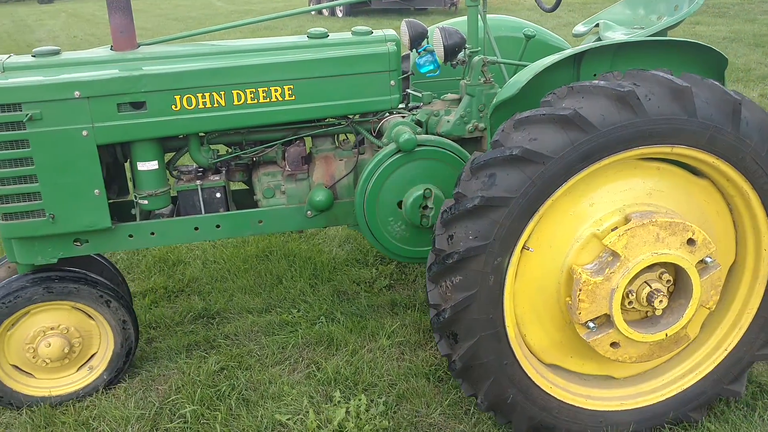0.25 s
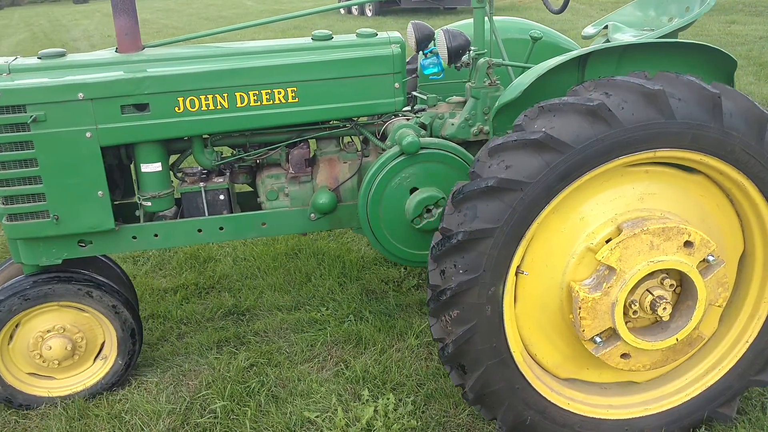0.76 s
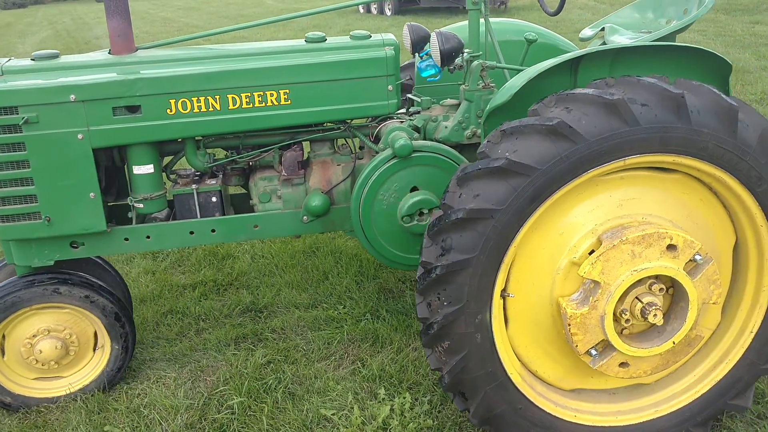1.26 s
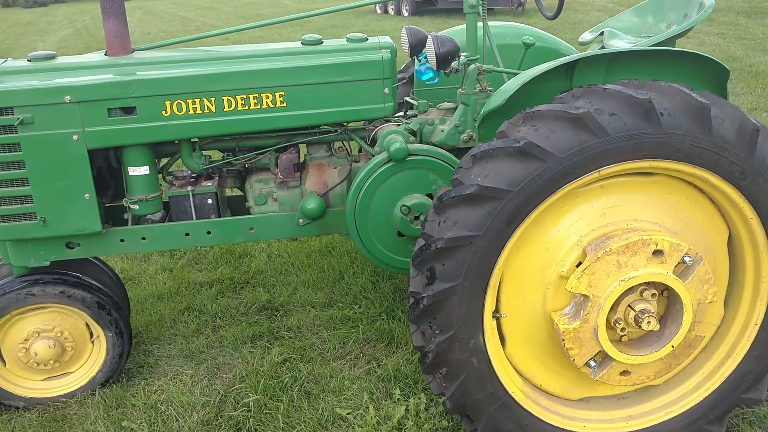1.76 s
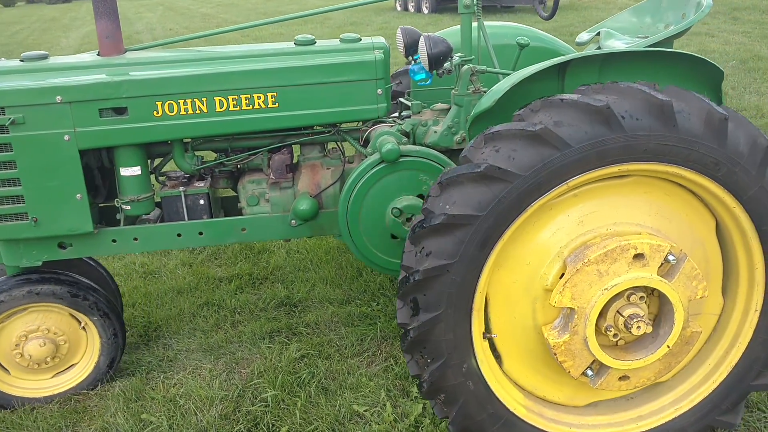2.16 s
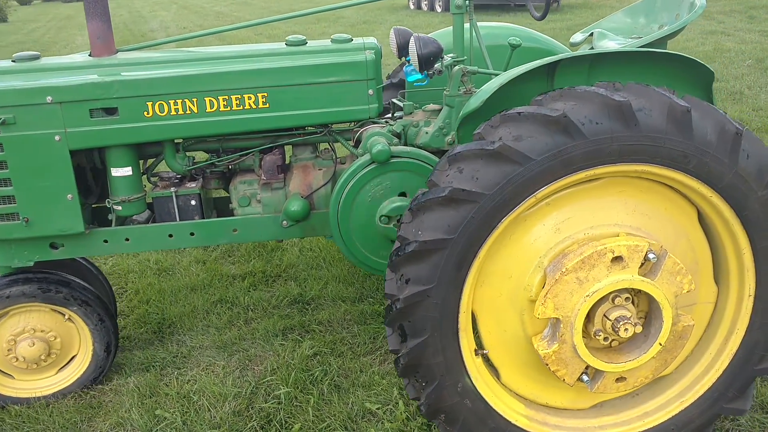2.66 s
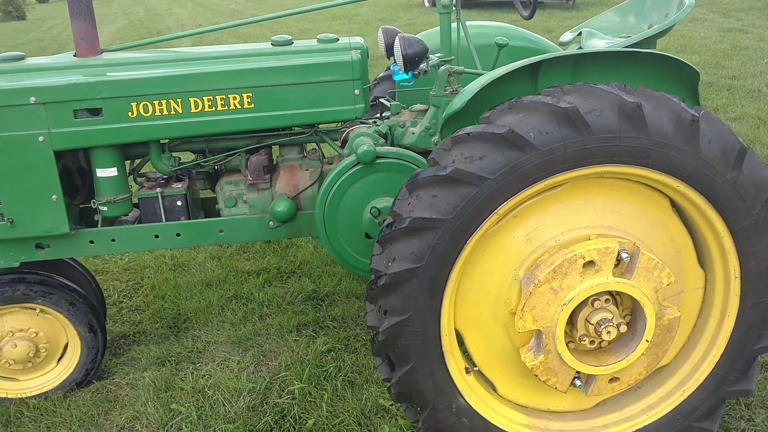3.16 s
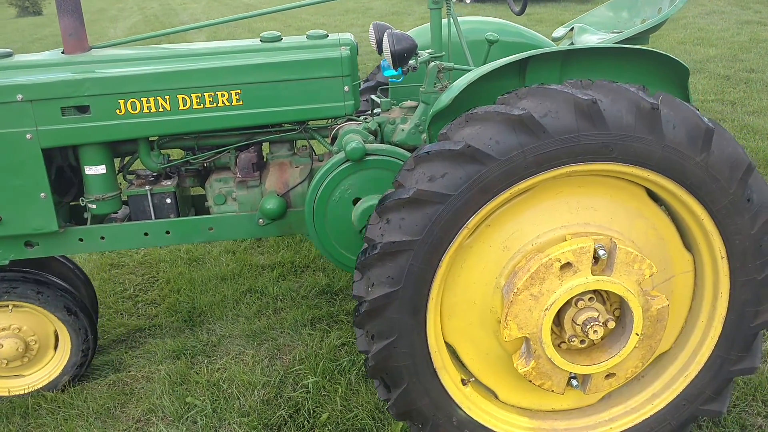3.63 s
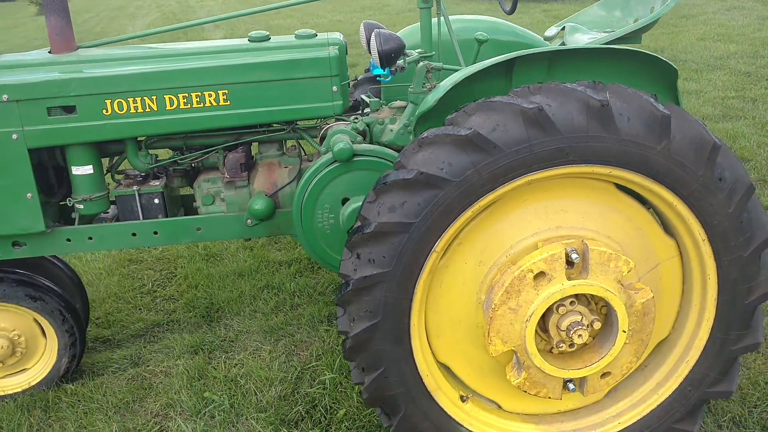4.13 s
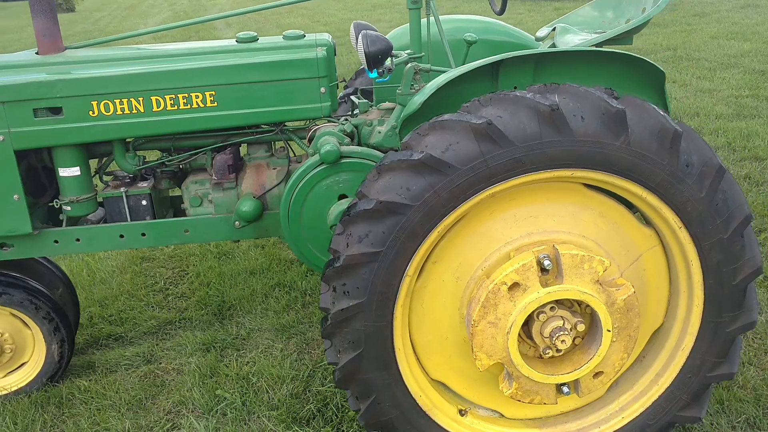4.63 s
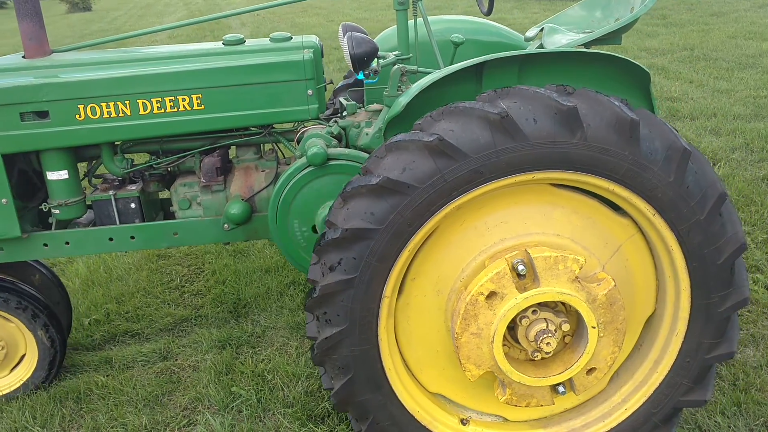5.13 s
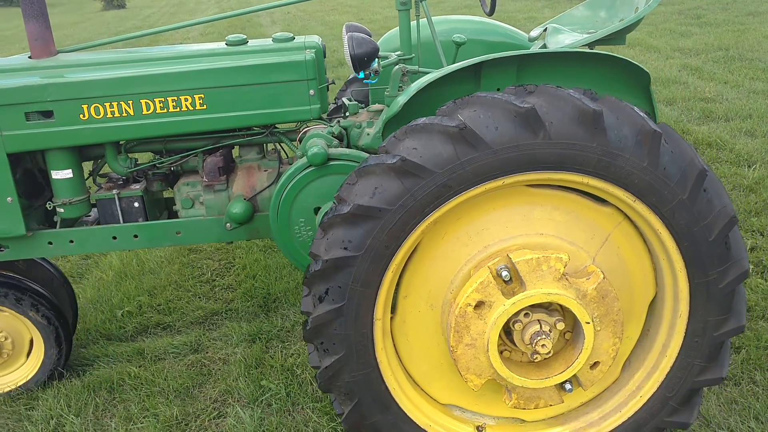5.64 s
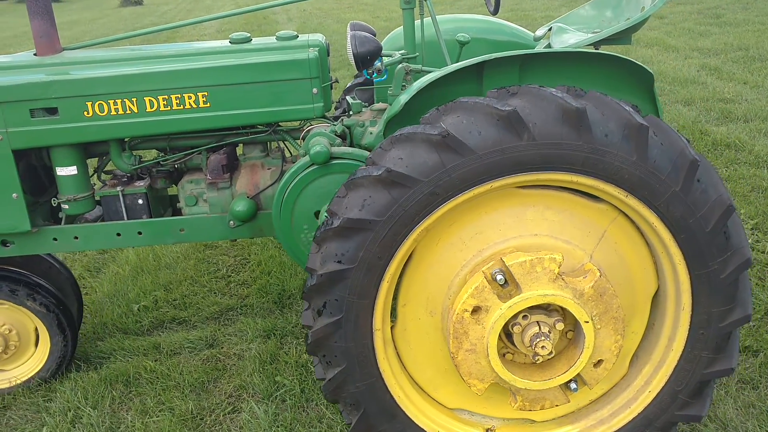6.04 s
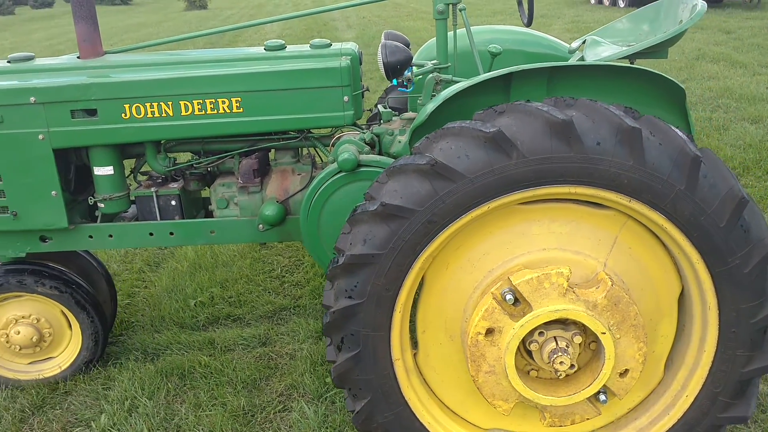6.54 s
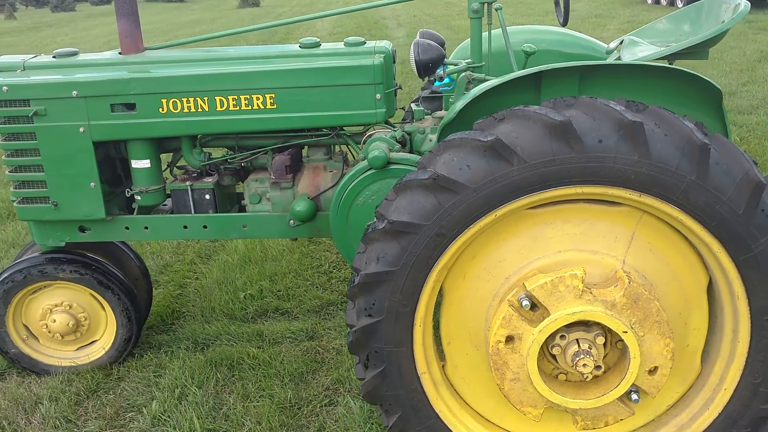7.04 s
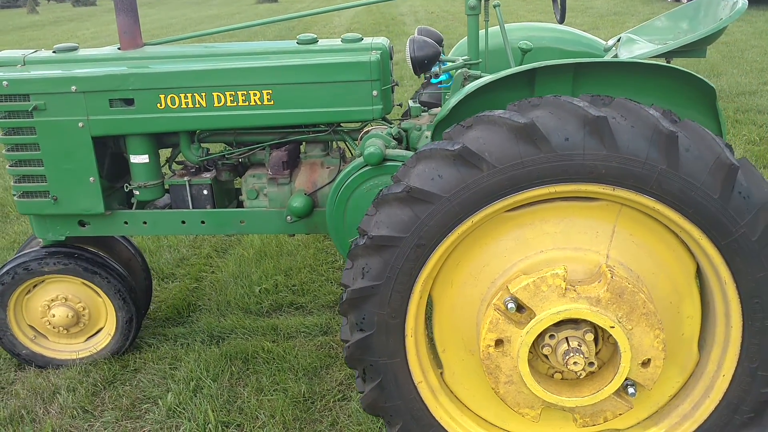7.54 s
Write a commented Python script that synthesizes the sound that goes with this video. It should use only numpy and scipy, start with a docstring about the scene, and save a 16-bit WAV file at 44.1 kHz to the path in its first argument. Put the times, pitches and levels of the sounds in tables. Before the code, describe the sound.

An old two-cylinder tractor idles very slowly outdoors, a sharp metallic clack then two hissing exhaust chuffs repeating over rumble, clatter and insects.

```python
"""Over a rumbling pipe, clattering gears and insects comes a sharp clack, then two hissing chuffs, again and again.
It is an old two-cylinder tractor idling very slowly on a lawn, and getting slower.
Chuffs, rumble, clatter and the insect choirs are noise shaped by resonances; the valve gear clacks in short
rattling bursts; hum, tinks, struck steel and one insect are wavering sine tones; pops are single pressure waves.
Two microphone ports hear it all, differing in colour and phase."""
import sys
import numpy as np
from scipy import signal
from scipy.fft import rfft, irfft, next_fast_len
from scipy.io import wavfile
from scipy.ndimage import uniform_filter1d, map_coordinates

SR = 44100
rng = np.random.default_rng(int(sys.argv[2]) if len(sys.argv) > 2 else 0)


def wav_record(signal):
    """Record a signal, one row per channel, as 16-bit PCM in the file named by sys.argv[1]."""
    frames = np.transpose(np.atleast_2d(signal))
    bounded = np.clip(frames, -1, 1)
    # unit amplitude maps onto the largest positive 16-bit level
    quanta = np.round(bounded * 32767).astype(np.int16)
    wavfile.write(sys.argv[1], SR, quanta)


N = 343539


def amp(db):
    """Turn decibels into a gain."""
    return 10 ** (np.asarray(db) / 20)


def unit(x):
    """Scale a signal to rms 1."""
    return x / np.sqrt(np.mean(x ** 2) + 1e-20)


def along(points, hz):
    """Read a curve of (Hz, value) points, with frequency on a log axis."""
    point_hz, value = np.transpose(points)
    return np.interp(np.log(hz + 1), np.log(point_hz + 1), value)


def curves(rows):
    """Draw one curve over time for each column after the time column."""
    s, *columns = np.transpose(rows)
    return [np.interp(np.arange(N) / SR, s, column) for column in columns]


def wobble(rate):
    """Draw a smooth random curve with this many knots a second."""
    knots = rng.standard_normal(int(N * rate / SR) + 4)
    return map_coordinates(knots, [np.arange(N) * rate / SR])


def filtered(x, response):
    """Pass a signal through a complex response of frequency."""
    m = next_fast_len(N + SR // 2)
    spectrum = rfft(x, m) * response(np.fft.rfftfreq(m, 1 / SR))
    return irfft(spectrum, m)[..., :N]


def modes(table):
    """Response of several resonances, each given as (Hz, width in Hz, dB), with alternating sign."""
    def response(f):
        total = 0
        for k, (centre, width, db) in enumerate(table):
            damping = 1j * f * width
            total = total + (-1) ** k * amp(db) * damping / (centre * centre - f * f + damping)
        return total
    return response


# How much alike noise is at the two ports. Each row: frequency in Hz, likeness (1 is identical).
PORT_LIKENESS = [(60, .65), (250, .8), (500, .6), (750, .94), (1250, .99), (1650, .75), (2290, .97),
                 (2370, .998), (2720, .998), (2790, .94), (3200, .85), (15000, .85)]


def rush(response, level, patchy_db=0, most_alike=1):
    """Patchy noise, partly alike at both ports: it follows a changing level, then rings through a response."""
    z = signal.stft(rng.standard_normal((2, N + 512)), nperseg=512)[2]
    patches = uniform_filter1d(rng.standard_normal(z.shape[1:]), size=4, axis=0)
    patches = unit(uniform_filter1d(patches, size=5, axis=1))
    pair = unit(signal.istft(z * amp(patchy_db * patches), nperseg=512)[1][:, :N])

    def shape(hz):
        colour = response(hz)
        turn = np.arccos(np.minimum(along(PORT_LIKENESS, hz), most_alike)) / 2
        return colour / np.sqrt(np.mean(abs(colour) ** 2)) * np.array([np.cos(turn), np.sin(turn)])

    shared, opposite = filtered(level * pair, shape)
    return np.array([shared + opposite, shared - opposite])


def add(track, s, piece):
    """Mix a piece into a track at s seconds."""
    part = track[round(s * SR):][:len(piece)]
    part += piece[:len(part)]


def pulse(db, hz, half_s):
    """A short pressure wave whose trough comes 20 ms after its start."""
    late = np.arange(round(.04 * SR)) / SR - .02
    return -amp(db) * np.cos(2 * np.pi * hz * late) * np.exp(-(late / half_s) ** 2 / 2)


def rattle(per_s, spread_db):
    """Gain of rms 1 made of many tiny, uneven contacts, each fading with a 1 ms time constant."""
    hits = (rng.random(N) < per_s / SR) * amp(spread_db * rng.standard_normal(N))
    fade = np.exp(-np.arange(SR // 200) / SR / .001)
    return unit(.5 + signal.fftconvolve(hits, fade)[:N])


# Insects in the grass. Each row: time in seconds, base level of the high choir in dB, of the low choir in dB.
INSECT_LEVELS = [(0.0, -60.5, -68), (1.67, -61.5, -68.5), (1.84, -66, -72), (3.25, -61.5, -69),
                 (7.29, -63.5, -72.5), (7.79, -58.5, -65)]
CHIRP_HZ, CHIRP_DB, CHIRP_WAVER_HZ = 5230, -65, 50  # a single singer in the low choir


def insects():
    """Two choirs of banded noise: a high sizzle and a pulsing lower one with one thin singer."""
    def band(centre_hz, width_hz):
        return lambda hz: modes([(centre_hz, width_hz, 0)])(hz) ** 3

    high_db, low_db = curves(INSECT_LEVELS)
    high_db = high_db + 6.0 + 0.25 * wobble(230) + 1.5 * wobble(4.32)
    low_db = low_db + 5.5 + 1.0 * wobble(41)
    high = rush(band(8205, 1560), amp(high_db), patchy_db=0.0)
    low = rush(band(5040, 1630), amp(low_db), patchy_db=3.0)
    gate = np.clip(wobble(40) + wobble(3) - .6, 0, 1.5)  # the singer comes and goes
    chirp_turns = np.cumsum(CHIRP_HZ + CHIRP_WAVER_HZ * wobble(28)) / SR
    return high + low + amp(CHIRP_DB) * gate * np.sin(2 * np.pi * chirp_turns)


SURGE_S, EBB_S = 0.03, 0.045  # time the flow takes to step up; time constant of the ebb


def flow(early_share_db):
    """Gas flow in the pipe: starts at the opening clack, is full by the first chuff, ebbs after the second."""
    t, out = np.arange(N) / SR, np.zeros(N)
    times = [s for s, *_ in CHUFFS] + [N / SR]
    ramp = lambda s: np.clip((t - s) / SURGE_S, 0, 1)
    for (clack_s, *_, early_db, full_db), first_s, second_s in zip(ENGINE_CYCLES, times[::2], times[1::2]):
        early = amp(early_db + early_share_db)
        rise = early * ramp(clack_s) + (amp(full_db) - early) * ramp(first_s - SURGE_S)
        out += rise * np.exp(-np.clip(t - second_s, 0, None) / EBB_S)
    return out


# Engine sound between the swells. Each row: time in seconds, base level of the rumble in dB, of the clatter in dB.
RUNNING_LEVELS = [(0.0, -47, -53.5), (0.5, -45, -50.5), (1.25, -48.5, -53.5), (1.95, -52.5, -55),
                  (2.7, -51, -55.5), (3.4, -47.5, -53), (4.1, -49, -54.5), (4.85, -51, -54),
                  (5.6, -55, -58), (6.35, -55.5, -56.5), (7.25, -54.5, -55.5), (7.79, -60, -66)]
# Resonances of the exhaust pipe. Each row: frequency in Hz, width in Hz, level in dB.
PIPE_MODES = [(156.4, 119, -15.5), (202, 35, -8.5), (261.3, 24.5, -5.5), (300.4, 11.6, -3),
              (337.8, 12, -3.5), (365.6, 32.6, -5), (433, 79, -9)]
# Colour of the gear clatter. Each row: frequency in Hz, relative level in dB per Hz.
GEAR_COLOUR = [(450, -3), (560, -7), (740, 0), (900, -5), (1200, -8), (1400, -15), (2100, -13), (2600, -20),
               (3300, -19), (4000, -24), (6300, -29), (9500, -33), (12000, -41), (15500, -50)]
# Two pipe modes sing. Each row: time in seconds, base level of the lower in dB, of the upper in dB.
HUM_LEVELS = [(0.0, -60.5, -60), (0.41, -61.5, -46), (0.52, -48.5, -56), (0.82, -52, -50),
              (0.87, -67, -58.5), (1.63, -65, -48), (1.67, -62, -58), (1.71, -52, -39), (1.78, -63, -41),
              (1.82, -56, -66), (2.26, -67, -54), (2.32, -52, -57), (2.6, -65.5, -52), (2.73, -53, -50.5),
              (2.86, -68, -61), (2.97, -46.5, -41.5), (3.08, -56, -56), (3.14, -56.5, -38),
              (3.47, -63, -65.5), (3.66, -58, -42), (4.21, -62.5, -65), (4.49, -57, -41.5),
              (4.58, -64.5, -49.5), (5.21, -63.5, -62.5), (5.27, -52, -33), (5.36, -71, -54.5),
              (5.81, -66, -63), (5.9, -74, -52), (6.09, -55.5, -48), (6.16, -60, -51.5),
              (6.64, -71.5, -56.5), (6.81, -60, -41.5), (6.92, -49.5, -46), (7.14, -64, -55),
              (7.59, -66, -77), (7.68, -60, -34.5), (7.72, -44, -42), (7.79, -61, -58)]
# The two singing modes, lower then upper: middle frequency in Hz.
HUM_PITCHES = (157.3, 260.5)
# The same two: extra level in dB, added to the base level.
HUM_EXTRA = (9.5, 6.5)
EARLY_RUMBLE_DB = -2  # the early flow rattles the gear more than it sounds the pipe
CLATTER_SWELL_DB = -6  # gain from the flow to the clatter


def running():
    """Flow keeps the pipe modes rumbling in lumps and humming; the gear train rattles in short grains."""
    t = np.arange(N) / SR
    rumble_db, clatter_db = curves(RUNNING_LEVELS)

    def pipe(hz):
        return modes(PIPE_MODES)(hz) / (1 + (hz / 520) ** 6) / (1 + (40 / (hz + 1)) ** 2)

    # the rumble breaks off while gas blows through
    hush_db = sum(-10 * np.exp(-((t - s - .004) / .012) ** 2) for s, *_ in CHUFFS)
    lumps_db = 1.0 * wobble(35) + 1.0 * wobble(23)
    rumble_level = np.hypot(amp(rumble_db), flow(EARLY_RUMBLE_DB))
    rumble = rush(pipe, rumble_level * amp(hush_db + 6.0 + lumps_db), patchy_db=2.0)

    hum = np.zeros(N)
    for hz, extra_db, db in zip(HUM_PITCHES, HUM_EXTRA, curves(HUM_LEVELS)):
        level = amp(db + extra_db + 2.2 * wobble(24))
        turns = np.cumsum(hz + 3 * wobble(13)) / SR  # the singing is slightly unsteady
        hum += level * np.sin(2 * np.pi * turns)

    def gears(hz):
        return amp(along(GEAR_COLOUR, hz)) / (1 + (420 / (hz + 1)) ** 6)

    clatter_level = np.hypot(amp(clatter_db), amp(CLATTER_SWELL_DB) * flow(0))
    grains = rattle(per_s=2000, spread_db=-1.0) * amp(1.5 + 1.34 * wobble(22))
    clatter = rush(gears, clatter_level * grains, patchy_db=0.5)
    return rumble + hum + clatter


# A loose steel part is struck. Each row: start in seconds, level in dB.
STEEL_HITS = [(7.088, -50.5), (7.427, -36.5)]
# How that part rings. Each row: frequency in Hz, relative level in dB, time to fade by 60 dB in seconds.
STEEL_MODES = [(755, -6, .12), (960, -9, .07), (1518, -5, .1), (1868, -14, .1), (2126, -2, .22),
               (3580, -10, .32), (3760, -19, .12), (4021, -8, .18), (4748, -7, .12)]


def ping():
    """Thin steel rings with several clear, slightly rough modes and a short crack."""
    t, out = np.arange(SR // 3) / SR, np.zeros(N)
    ring = np.zeros(len(t))
    for hz, db, t60 in STEEL_MODES:
        rough = amp(3 * wobble(90)[:len(t)])
        ring += amp(db - 60 * t / t60) * rough * np.sin(2 * np.pi * hz * t)
    crack = uniform_filter1d(rng.standard_normal(len(t)), size=5) * amp(-17 - 60 * t / 0.05)
    strike = (1 - np.exp(-t / 0.001)) * ring + crack
    for s, db in STEEL_HITS:
        add(out, s, amp(db) * strike)
    return out


# A small lever flicks over once in most cycles. Each row: time in seconds, level in dB, middle of the ring in Hz.
LEVER_FLICKS = [(0.533, -60, 1760), (0.6474, -39, 1995), (1.361, -39, 2006), (2.0974, -48, 1950),
                (2.8613, -41, 1924), (3.5249, -39.5, 2000), (4.2014, -45, 2070), (4.9322, -49, 1870),
                (7.141, -50, 1790)]
TINK_T60_S = 0.17  # time the ring takes to fade by 60 dB


def tinks():
    """A light part rings on one rough mode with a tiny tick."""
    t, out = np.arange(SR // 5) / SR, np.zeros(N)
    noises = rng.standard_normal((len(LEVER_FLICKS), len(t)))
    for (s, db, hz), noise in zip(LEVER_FLICKS, noises):
        turns = np.cumsum(hz + 900 * uniform_filter1d(noise, size=90)) / SR  # noise shakes the pitch
        ring = np.sin(2 * np.pi * turns) * amp(-60 * t / TINK_T60_S) * (1 - np.exp(-t / .001))
        tick = amp(-17 - 60 * t / 0.027) * noise
        add(out, s - .001, amp(db) * (ring + tick))
    return out


# Dull pops in the pipe. Each row: time of the trough in seconds, peak in dB.
PIPE_POPS = [(0.467, -23), (3.432, -23), (6.361, -26.5)]


def pops():
    """A late pocket of gas burns in the pipe: one soft push."""
    out = np.zeros(N)
    for s, db in PIPE_POPS:
        add(out, s - .02, pulse(db, hz=330, half_s=0.0011))
    return out


# Engine cycles, each opened by a sharp clack ahead of its chuffs. Each row: clack time in seconds, clack strength
# in dB, knock over it in dB, extra snap in dB, base level of the early gas flow in dB, of the full flow in dB.
ENGINE_CYCLES = [(0.041, -32, -3, 4.5, -62, -43), (0.7206, -25, -5.5, -5.5, -40, -48),
                 (1.471, -28, -10, -3, -43.5, -40.5), (2.192, -32.5, -12.5, 2.5, -50, -42.5),
                 (2.886, -31, -11, -3.5, -48, -43.5), (3.589, -29, -6, -2.5, -41.5, -44),
                 (4.295, -31, -5, -3, -43, -43), (5.03, -33, -4, 2.5, -54, -42.5),
                 (5.791, -36, -1.5, 7, -50.5, -41.5), (6.592, -35.5, -4.5, 2, -57, -41.5),
                 (7.4787, -31.5, 0.5, -5, -51, -42)]
# Other valve gear contacts. Each row: time in seconds, strength in dB, knock over it in dB.
OTHER_CLACKS = [(0.2165, -37, -6), (0.646, -35.5, -1), (0.8107, -37.5, -9), (0.917, -39.5, -6),
                (1.363, -42, 1), (1.449, -47.5, 10.5), (1.666, -33.5, 0), (2.08, -47.5, 6.5),
                (2.171, -44.5, 7), (2.252, -40.5, 3), (2.279, -47, -17), (2.3805, -33, -5.5),
                (2.861, -43, -0.5), (3.076, -37, -3), (3.525, -41, 0), (3.778, -51, 13.5), (4.48, -41, 5),
                (5.228, -47, 9), (5.874, -49, 3), (6, -35.5, 1), (6.367, -45, -1), (6.47, -47, -17),
                (6.82, -32, -1), (7.0904, -52, -7), (7.325, -46, -2), (7.445, -42.5, 0), (7.497, -50, -3),
                (7.562, -64, -15), (7.7123, -32.5, 3)]
# The opening clack rebounds. Each row: average delay after it in seconds, level against it in dB.
CLACK_REBOUNDS = [(0.031, -10), (0.065, -21), (.09, -16.5)]
# Resonances of the tappets. Each row: frequency in Hz, width in Hz, level in dB.
TAPPET_MODES = [(1658, 206, -2.5), (1960, 400, -3), (2184, 105, 2.5), (2810, 71, -1)]
# Bright edge of a contact. Each row: frequency in Hz, width in Hz, level in dB.
SNAP_MODES = [(2730, 600, 10.5), (3500, 29, -19), (3980, 27, 3), (5200, 450, 3), (7300, 2800, -4)]
# Resonances of the engine block. Each row: frequency in Hz, width in Hz, level in dB.
BLOCK_MODES = [(764, 133, 8.5), (1197, 246, 3)]
LIFT_S, LIFT_DB = 0.021, -37.5  # a lifter takes up its play this long before the first chuff of a cycle
CLACK_T60_S = 0.14  # time a contact takes to fade by 60 dB


def valve_gear():
    """Each contact rattles out through tappet and block; harder blows snap brighter."""
    t = np.arange(SR // 4) / SR
    tick, snap, knock = np.zeros((3, N))
    # each contact: seconds, strength dB, knock dB over it, extra snap dB
    contacts = [row[:4] for row in ENGINE_CYCLES]
    for s, db, *_ in ENGINE_CYCLES:
        for late_s, loss_db in CLACK_REBOUNDS:
            contacts.append((s + late_s + rng.normal(0, 0.0024), db + loss_db, -6, 2))
    contacts += [(s - LIFT_S, LIFT_DB, -2, -6) for s, *_ in CHUFFS[::2]]
    contacts += [(*row, 0) for row in OTHER_CLACKS]

    fade = amp(-60 * t / CLACK_T60_S) * (1 - np.exp(-t / .0005))
    sharp_fade = fade + 0.52 * amp(-60 * t / 0.017)
    slow_fade = fade ** 0.5 * (1 - np.exp(-t / 0.0019))
    for s, db, knock_db, snap_db in contacts:
        add(tick, s - .002, amp(db - 7.0) * fade)
        # 1.84 dB more snap for each dB of strength
        add(snap, s - .002, amp(1.84 * (db + 33.0) + snap_db - 43.0) * sharp_fade)
        add(knock, s - .002, amp(db + knock_db - 4.0) * slow_fade)

    bright = lambda hz: modes(SNAP_MODES)(hz) / (1 + (hz / 8000) ** 4)
    chatter = rattle(per_s=700, spread_db=3.5)  # loose parts chatter on after the blow
    tappets = rush(modes(TAPPET_MODES), chatter * tick, patchy_db=2)
    edges = rush(bright, chatter * snap, patchy_db=2.5)
    block = rush(modes(BLOCK_MODES), knock, patchy_db=1.5)
    return tappets + edges + block


# Exhaust chuffs, two to a cycle. Each row: time in seconds, strength in dB, then bark, honk and hiss over it in dB,
# valve open time in ms, base share of that before the peak (each part skews it), lowest bark mode over the rest
# in dB, lower rasp modes over the upper in dB (the last two before a fixed shift).
CHUFFS = [(0.158, -27.5, -11.5, 2, 2, 34.8, 0.46, -7, -1), (0.3169, -35.5, 1, 1.5, 2, 21.4, 0.39, 10, -7),
          (0.8459, -29.5, -4.5, 0.5, 3.5, 38, 0.5, 6, -6), (1.021, -26, 0, -2, 1, 27.4, 0.48, 4.5, 3.5),
          (1.6061, -30.5, -7, -0.5, 4, 39.3, 0.33, -9, 1), (1.7698, -21.5, -3, -6, -3, 28.3, 0.47, 3, -2),
          (2.322, -29.5, -5.5, -1, 2.5, 32, 0.51, -30, -7), (2.4831, -26, -2, -4, 0, 28.8, 0.41, -2, -5),
          (3.015, -30, -2, 3, 2, 32.2, 0.49, -11.5, -8), (3.177, -26.5, -2.5, -5, 0, 32.3, 0.4, 5.5, 0),
          (3.717, -23, -4.5, -12, -3, 28.3, 0.38, 7.5, 3),
          (3.8754, -24.5, -4, -4, -2.5, 32.3, 0.42, -11, 4), (4.421, -28, -3, -8, 2.5, 34.4, 0.36, -2, 2),
          (4.58, -20, -11.5, -8.5, -3.5, 30.3, 0.56, 6, 4.5),
          (5.1675, -27.5, -5, -3.5, 1.5, 32, 0.45, -5, 12), (5.3284, -22, -10, -12, -4, 31.3, 0.45, 3, 4.5),
          (5.94, -27.5, -5.5, -2, 1, 28, 0.46, -14.5, -2.5),
          (6.1047, -25, -6, -2.5, -0.5, 34.7, 0.35, 6.5, -6), (6.757, -34, 1.5, 3.5, 5.5, 39, 0.36, -7, -4),
          (6.9422, -23.5, -5.5, -4, -1.5, 33.3, 0.37, 6, -2),
          (7.646, -27.5, -5, -2, 0.5, 33.4, 0.59, -5, -3.5)]
# Low outlet modes. Each row: frequency in Hz, width in Hz, level in dB.
BARK_MODES = [(735.5, 90, 0), (1027, 110, 2), (1182, 100, -0.5), (1465, 170, -5)]
# Middle outlet modes. Each row: frequency in Hz, width in Hz, level in dB.
HONK_MODES = [(1800, 120, -7), (2130, 150, 0), (2330, 180, -3), (2650, 200, -8)]
# Upper outlet modes. Each row: frequency in Hz, width in Hz, level in dB.
RASP_MODES = [(2842, 160, 1.5), (3327, 260, -1), (3680, 300, -6.5), (3990, 150, -7), (4440, 400, -8)]
# Hiss of the jet itself. Each row: frequency in Hz, width in Hz, level in dB.
HISS_MODES = [(5460, 1100, -1), (7070, 350, 0.5), (8790, 2130, -0.5), (10850, 4000, -9.5),
              (14600, 1800, -43)]
# Sheet steel of the hood. Each row: frequency in Hz, width in Hz, level in dB.
HOOD_MODES = [(1190, 25, -2), (2126, 14, -3), (3580, 14, -4), (4021, 18, -8)]
# Pressure wave as the valve opens: average peak in dB, frequency in Hz, half length in seconds.
OPENING_PUSH = (-26, 310, .0026)
# Pressure wave as it shuts: base peak in dB, frequency in Hz, half length in seconds.
SHUTTING_THUMP = (-38.5, 110, .0046)
THUMP_FADE_DB_PER_S = -.5  # the thump weakens as the engine slows
JET_ALIKE = .945  # a near jet is never quite the same at both ports


def chuffs():
    """Gas jets through the open valve in four parts, the honk peaking earliest; a push opens, a thump shuts."""
    t = np.arange(SR // 5) / SR
    bark, honk, rasp, hiss, lows, deep_db, dark_db = np.zeros((7, N))

    def jet(open_s, skew, tail_db, t60):
        lift = np.sin(np.pi * np.clip(t / open_s, 0, 1) ** skew) ** 1.28
        echo = amp(tail_db - 60 * t / t60) * (1 - np.exp(-(t / 0.012) ** 2))  # the yard answers briefly
        return np.hypot(lift, echo)

    for s, db, bark_db, honk_db, hiss_db, open_ms, peak_share, deep, dark in CHUFFS:
        start, open_s = s - .008, open_ms / 1000
        late = np.log(2) / -np.log(peak_share)  # skew that puts the peak at this share
        add(bark, start, amp(db + bark_db) * jet(open_s + 0.0049, 1.14 * late, 2, 0.14))
        add(honk, start, amp(db + honk_db) * jet(open_s + 0.006, 0.74 * late, 0, 0.12))
        add(rasp, start, amp(db) * jet(open_s + 0.004, 1.05 * late, -0.58, 0.11))
        add(hiss, start, amp(db + hiss_db) * jet(open_s, 1.12 * late, -.5, 0.1))
        add(deep_db, start, np.full(SR // 8, deep))
        add(dark_db, start, np.full(SR // 8, dark))
        add(lows, s - .025, amp(rng.normal(0, 2)) * pulse(*OPENING_PUSH))
        thump_db = 3 + THUMP_FADE_DB_PER_S * s + rng.normal(0, 3.5)
        add(lows, s + 0.0063, amp(thump_db) * pulse(*SHUTTING_THUMP))

    def blow(table, level):
        ragged = unit(amp(1.2 * wobble(300)))  # turbulence tears each part of the jet into its own bursts
        return rush(modes(table), ragged * level, patchy_db=2.5, most_alike=JET_ALIKE)

    def tilted(table, split, level, tilt_db):
        """Share one level between lower and upper modes, the lower tilt_db over the upper."""
        lower = blow(table[:split], level / np.hypot(1, amp(-tilt_db)))
        upper = blow(table[split:], level / np.hypot(1, amp(tilt_db)))
        return lower + upper

    # the outlet favours other modes each time
    jets = tilted(BARK_MODES, 1, bark, deep_db - 6) + tilted(RASP_MODES, 2, rasp, dark_db + 4)
    jets += blow(HONK_MODES, honk) + blow(HISS_MODES, hiss)
    hood = rush(modes(HOOD_MODES), amp(-20) * rasp)  # the blast sets the hood ringing
    return jets + hood + lows


def scene():
    """Add up everything that reaches the two ports."""
    return insects() + running() + ping() + tinks() + pops() + valve_gear() + chuffs()


# Loudness of the right port. Each row: frequency in Hz, gain in dB.
RIGHT_GAIN = [(60, -3.5), (92, -4), (150, -6.5), (260, -15), (400, -10), (600, 0), (770, -4.5), (1170, -.5),
              (1600, 2), (2300, 0), (2750, 0), (4190, -1.5), (6410, -3.5), (9810, -5.5), (13000, -3),
              (15300, -10)]
# Phase turn of the right port. Each row: frequency in Hz, angle in radians.
RIGHT_PHASE = [(60, 4.3), (250, 4.7), (450, 3.9), (700, 2.45), (1250, 3), (1900, 2.3), (2330, 2.39),
               (2750, 3.39), (2900, 3.1), (3200, 2.8), (15000, 2.95)]
RIGHT_LAG_S = .000378  # delay of the right port
TOP_HZ = 15850  # band limit of both ports


def record(dry):
    """The right port is later, turned in phase and weaker in the bass; both cut steeply at the band limit."""
    def ports(hz):
        turn = along(RIGHT_PHASE, hz) - 2 * np.pi * hz * RIGHT_LAG_S
        right = amp(along(RIGHT_GAIN, hz)) * np.exp(1j * turn)
        limit = 1 / (1 + (hz / TOP_HZ) ** 300)
        return np.array([np.ones(len(hz)), right]) * limit

    return filtered(dry, ports)


dry = scene()
out = record(dry)
wav_record(out)
```